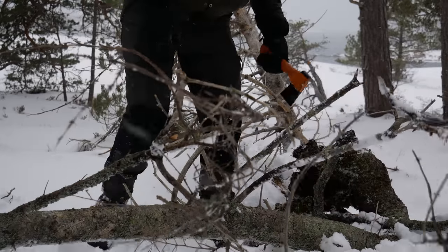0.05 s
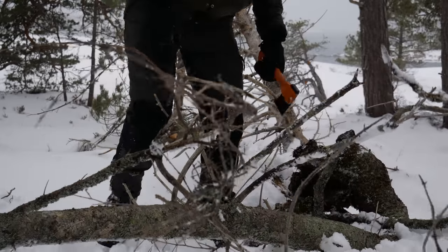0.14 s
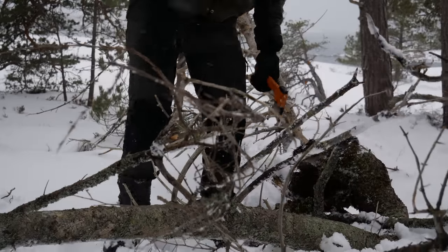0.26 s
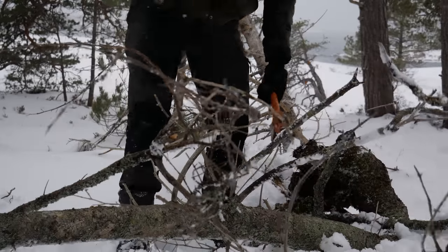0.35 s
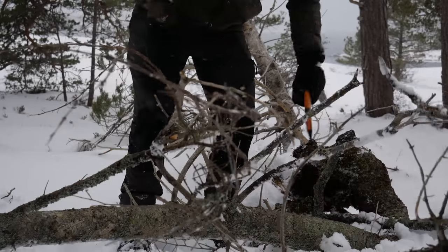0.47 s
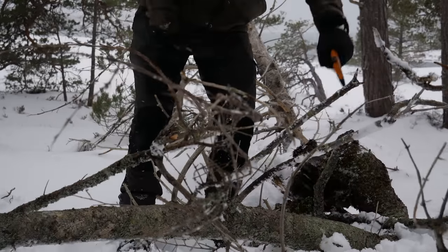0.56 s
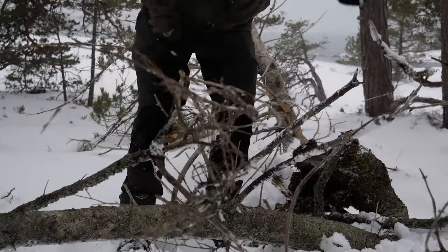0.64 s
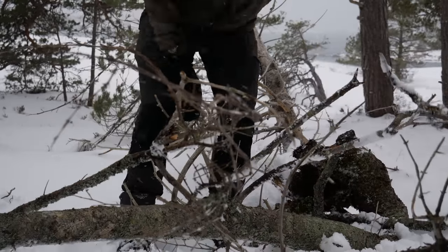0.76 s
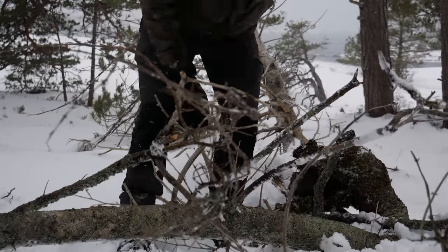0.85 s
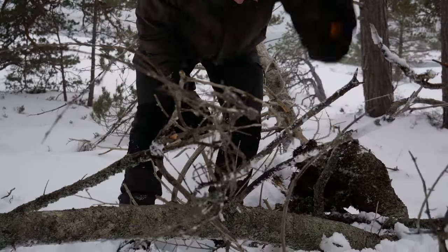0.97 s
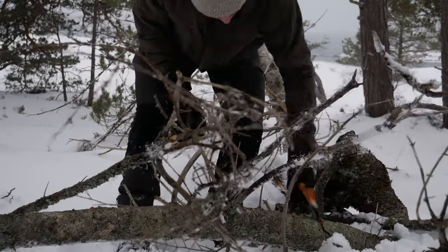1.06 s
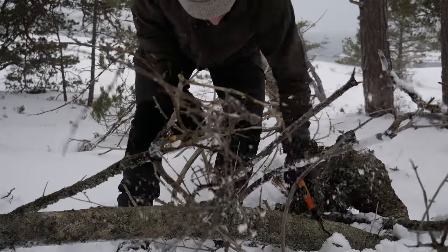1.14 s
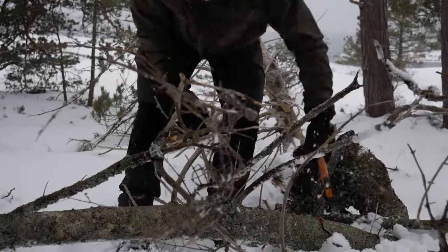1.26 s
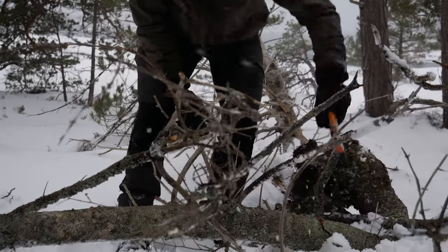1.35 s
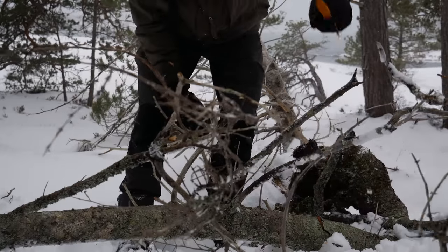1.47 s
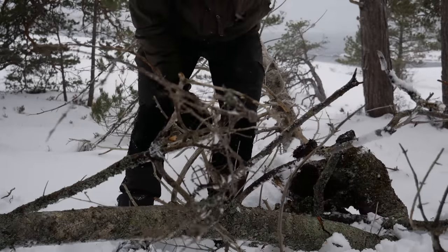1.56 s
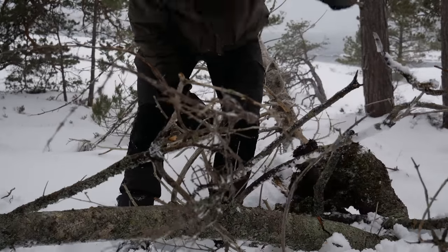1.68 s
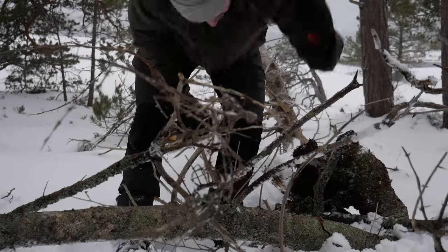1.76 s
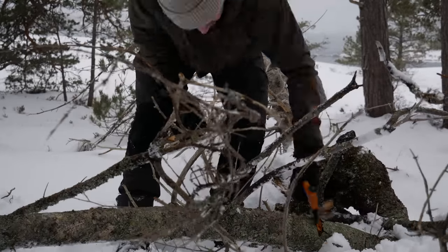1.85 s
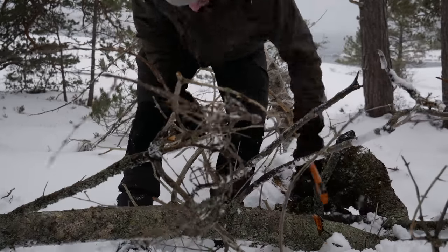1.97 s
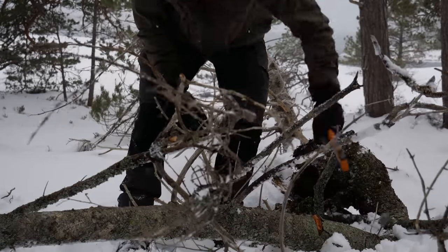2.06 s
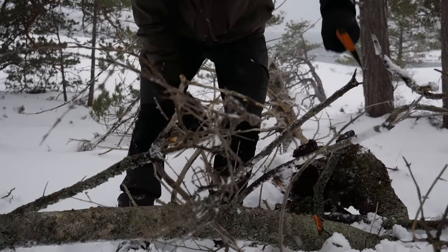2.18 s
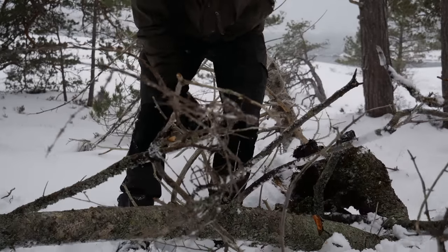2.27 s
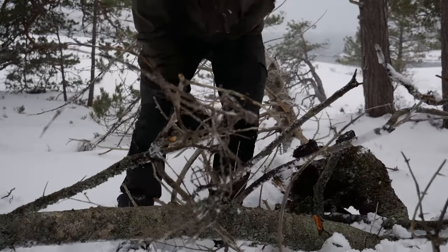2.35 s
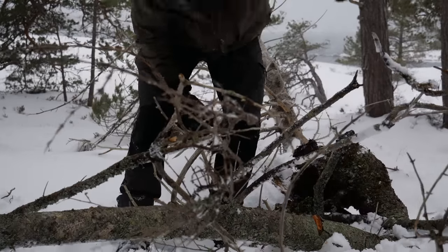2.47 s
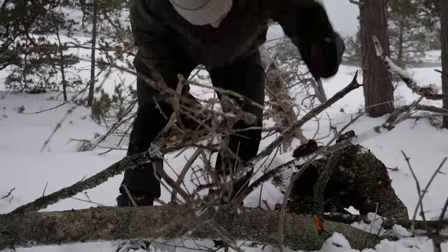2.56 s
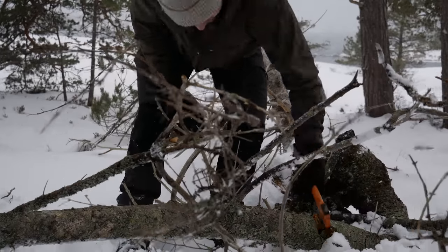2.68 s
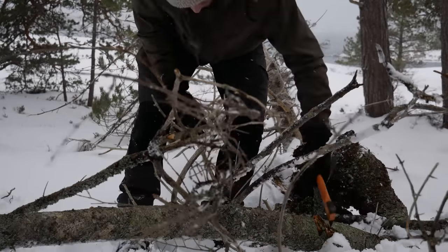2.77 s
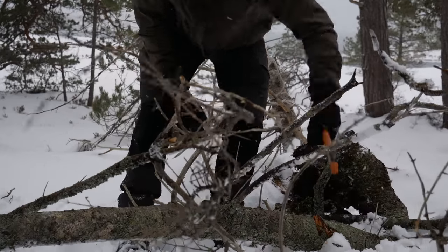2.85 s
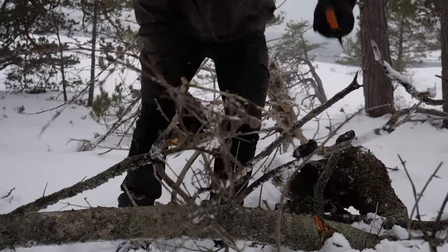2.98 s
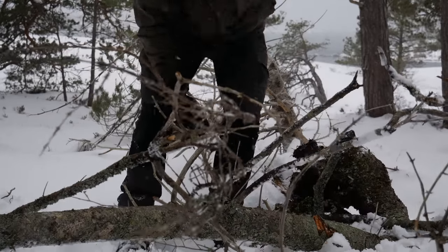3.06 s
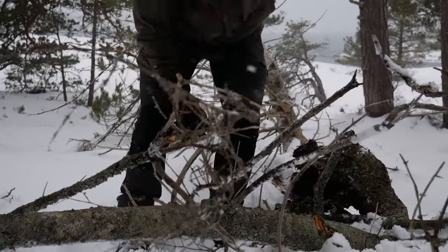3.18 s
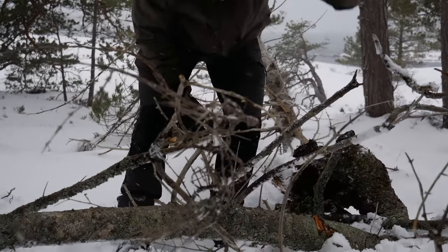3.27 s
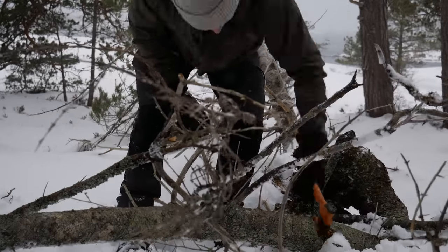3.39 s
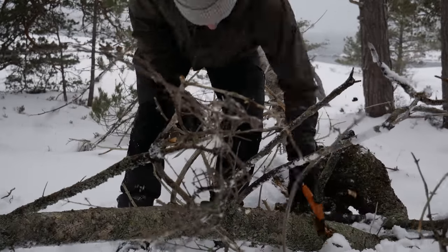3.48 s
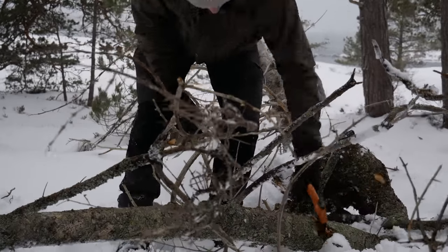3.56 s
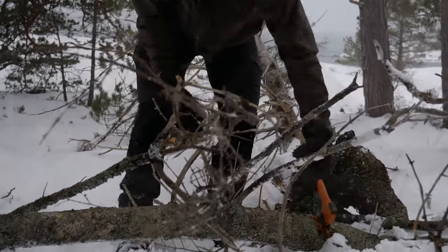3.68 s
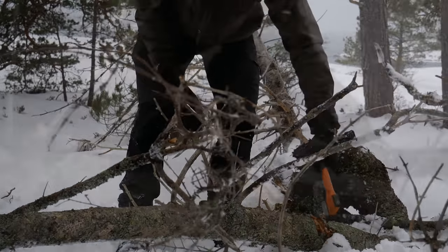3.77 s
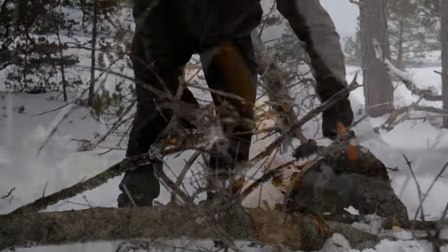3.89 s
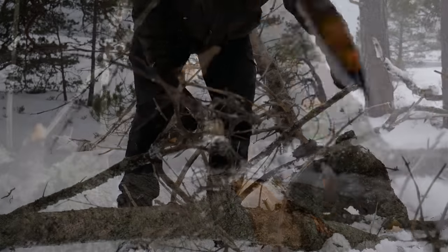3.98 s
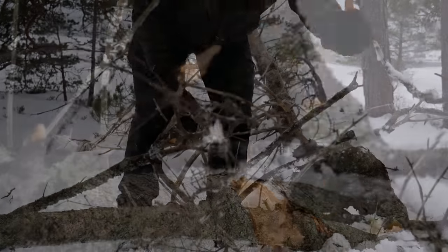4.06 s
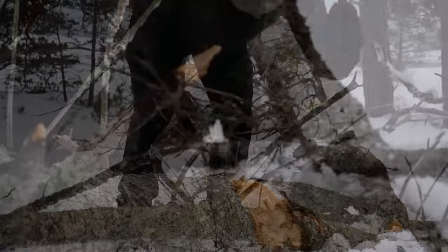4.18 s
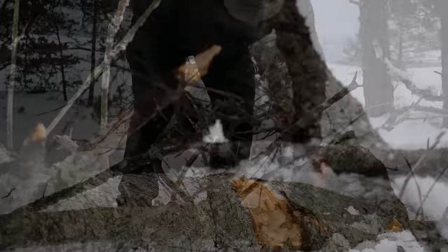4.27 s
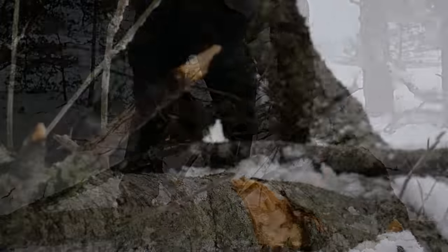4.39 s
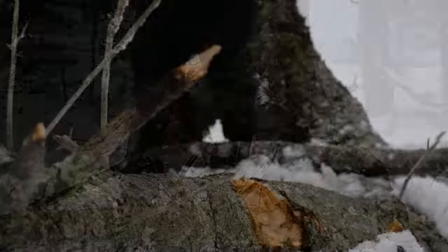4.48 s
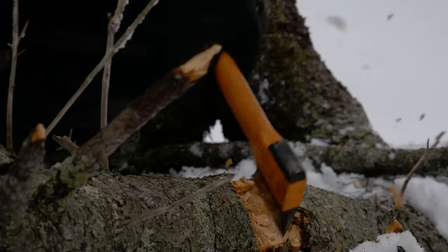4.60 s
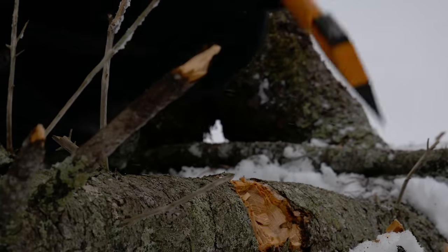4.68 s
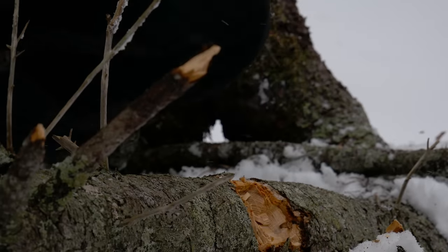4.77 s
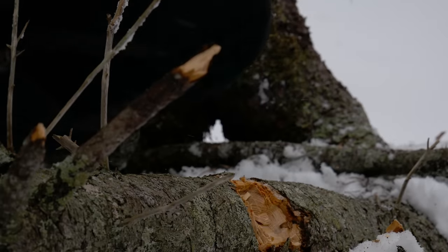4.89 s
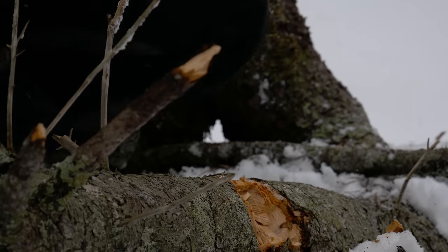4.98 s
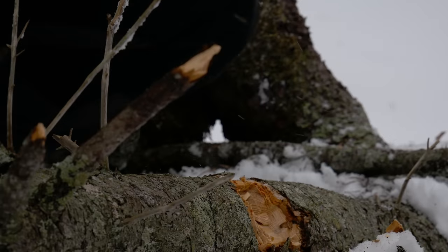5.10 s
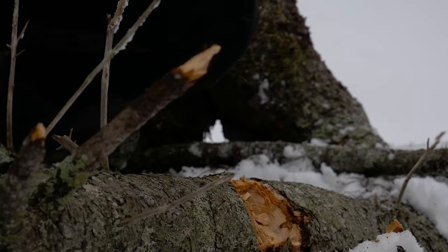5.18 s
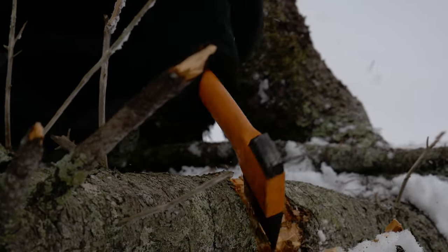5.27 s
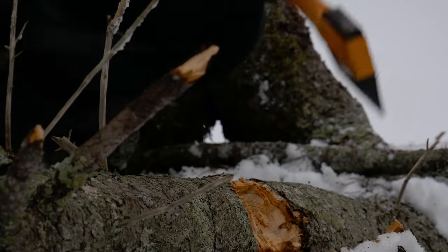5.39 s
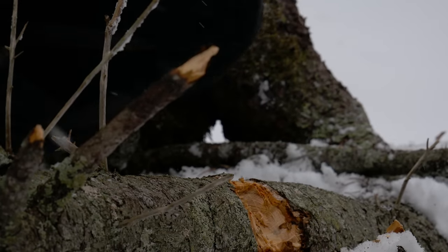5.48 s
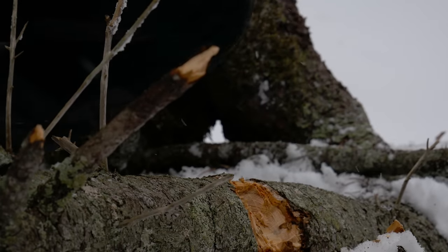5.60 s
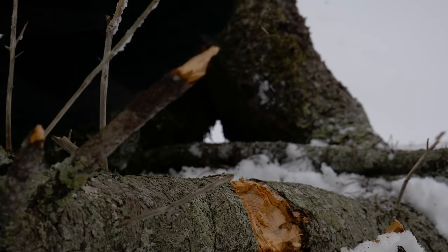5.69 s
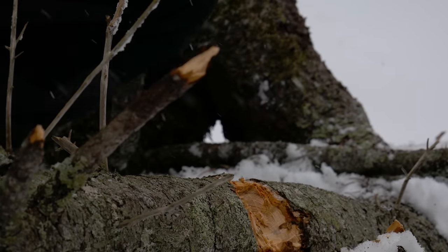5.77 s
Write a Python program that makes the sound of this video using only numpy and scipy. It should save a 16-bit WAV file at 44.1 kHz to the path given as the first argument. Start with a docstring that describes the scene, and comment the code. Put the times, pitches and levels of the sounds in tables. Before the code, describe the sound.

Dry, overloaded axe blows on wood, about one every 0.8 seconds, move from a few steps away to close up in breezy snowy woods.

```python
"""A hatchet chops a thin fallen trunk in a snowy pine wood, first from a few steps away, then, fading over, close by.
Each blow sums decaying wood modes and noise bursts, clipped by an overloaded microphone input with gain control.
Filtered noise and clicks spray as snow and chips; slow low modes make the trunk thud and the ground shudder late.
Short noise ticks are chips landing; shaped noise is wind hissing in the crowns and buffeting the microphone ports."""
import sys
import numpy as np
from scipy import signal
from scipy.fft import rfft, irfft
from scipy.io import wavfile

SR = 44100
rng = np.random.default_rng(int(sys.argv[2]) if len(sys.argv) > 2 else 0)


def to_wav(sig):
    """Store sig (one row per channel, or 1-D mono) as 16-bit WAV at the path in sys.argv[1].

    Samples outside -1..1 are clipped; the rate is SR.
    """
    pcm = np.clip(np.atleast_2d(sig), -1, 1) * 32767
    pcm = np.round(pcm).astype(np.int16)
    wavfile.write(sys.argv[1], SR, pcm.T)  # frames by channels


N = 257544
T = np.arange(N) / SR

# hatchet blows: start_s, place, strength_db (before overdrive), ring_hz, ring_t60_s,
# pitch_excess (share above ring_hz at contact), crack_db, thud_db, thud_tilt_db_per_octave,
# spray_db, spray_lasts_s, bright_crumbs_hz
BLOWS = [(1.133, "far", -7, 973, .036, 0.3, -10, -13.5, -2, -27.5, 0.1, 2980),
         (1.9347, "far", -10.5, 1027, .029, 0.62, 0, -16.5, -5.5, -21, 0.19, 3380),
         (2.7216, "far", -9.5, 958, .026, 1.11, -22, -16, -5.5, -27.5, 0.26, 3500),
         (3.495, "far", 0, 969, .023, 0.12, -5, -13, 1, -19, 0.37, 4260),
         (3.891, "close", 0.5, 781, .031, 0.63, -17, -8, -0.7, -24, 0.24, 3500),
         (4.3824, "far", -7, 969, .026, 0.264, -29, -18, -4, -31, 0.058, 3500),
         (4.609, "close", -2.5, 839.5, .024, 1.38, 1.5, -11.5, -0.5, -19, 0.15, 6570),
         (5.319, "close", -9.5, 897, .038, 0.56, -23, -9, 4, -46, 0.049, 3500)]
# overtones of the wood ring: frequency_ratio, relative_level_db, share_of_ring_t60
WOOD_OVERTONES = [(0.781, -0.5, 0.9), (1, 3.5, 0.97), (1.45, 1, 0.58), (1.799, -5.5, 0.67),
                  (2.299, -12.5, 0.73), (3.1, 0, 0.091)]
# slow bending of the trunk, lows arrive later: frequency_hz, relative_level_db, t60_s, delay_s
TRUNK_MODES = [(477, 8.5, 0.16, 0.00499), (400, 19, 0.034, 0.00705), (283.2, 12.5, 0.12, 0.00837),
               (205.4, -2, 0.27, 0.0132), (149.1, 2.5, 0.23, 0.0201), (110, -3, 0.24, 0.0293)]
# bending of the ground under it: frequency_hz, relative_level_db, t60_s, delay_s (added to the place delay)
GROUND_MODES = [(75.9, 8.7, 0.33, -0.0173), (55.1, 9.7, 0.64, 0.0013), (35.9, 4.7, 0.68, 0.0037)]
# ground shudder at each place: level_db, delay_s, tilt_db_per_octave
GROUND_PATHS = {"far": (-22, .097, -1), "close": (-24, .075, -5)}
LEAD_S = .004   # sound rendered ahead of contact
OVERDRIVE_DB, BRIGHT_CRUMBS_DB, SPLINTER_DB = 19.5, 1.5, -2.5
SAG_S = .0018   # time constant of the falling ring pitch


def blows():
    """Impact excitation: the blade sets wood modes ringing, cracks fibres, and shakes trunk, snow and ground."""
    out = np.zeros(N)
    t = np.arange(round(.6 * SR)) / SR - LEAD_S
    after = np.maximum(t, 0)
    spray = debris()
    for (start, place, strength_db, ring_hz, ring_t60, excess, crack_db,
         thud_db, tilt_db, spray_db, lasts, crumbs_hz) in BLOWS:
        shudder_db, ground_delay, ground_tilt_db = GROUND_PATHS[place]
        # the cut is stiffest on contact, so the ring starts high and sags
        cycles = ring_hz * (t + excess * SAG_S * (1 - np.exp(-after / SAG_S)))
        phases = rng.random(len(WOOD_OVERTONES))
        noise = rng.standard_normal((3, len(t)))
        ring = 0
        for (ratio, db, share), phase in zip(WOOD_OVERTONES, phases):
            ring = ring + amp(db) * dying(t, ring_t60 * share) * np.sin(2 * np.pi * (ratio * cycles + phase))

        crack = amp(crack_db) * band(noise[0], 1130, 5200) * dying(t, 0.018)
        # torn grain fills the gaps between the modes
        splinters = amp(SPLINTER_DB) * rms_one(band(noise[1], 710, 1660)) * dying(t, 0.73 * ring_t60)
        # the force builds while the wedge sinks in
        contact = 1 - np.exp(-(after / 0.001) ** 2)
        # the edge starts cutting bark just before
        bite = amp(-33) * band(noise[0], 900, 5400) * np.exp(-np.abs(t) / 0.0027)
        blow = amp(strength_db + OVERDRIVE_DB) * (ring + crack + splinters) * contact + bite

        crumbs = np.resize(spray[round(start * SR):], len(t))
        crumbs = crumbs + amp(BRIGHT_CRUMBS_DB) * band(crumbs, crumbs_hz / 1.11, crumbs_hz * 1.03)
        falling = dying(t, 0.3) / (1 + (after / lasts) ** 4)   # keeps raining, then stops
        fallout = amp(spray_db) * crumbs * falling

        # the trunk jolts on its bed
        loose = 1.25 * rms_one(band(noise[2], 120, 380)) * dying(t - .004, .16)
        thud = amp(thud_db) * (swelling(t, TRUNK_MODES, 0.00026, 0.13, tilt_db) + loose)
        shudder = amp(shudder_db) * swelling(t - ground_delay, GROUND_MODES, 0.036, 0.12, ground_tilt_db)
        add(out, start - LEAD_S, fade(start, place) * overload(blow + fallout + thud + shudder))
    return out


def swelling(t, modes, rise_s, detune, tilt_db=0):
    """Modal superposition: delayed damped modes build up, then die."""
    out = 0
    # the blade lands elsewhere each time, so strength and pitch vary
    draws = rng.random((len(modes), 3))
    for (hz, db, t60, delay), (luck, phase, offset) in zip(modes, draws):
        u = np.maximum(t - delay, 0)
        pitch = hz * (1 + detune * (offset - .5))
        level = amp(db + tilt_db * np.log2(hz / 256) + 4.75 * (luck - 3.0))
        envelope = level * (1 - np.exp(-u / rise_s)) * dying(u, t60)
        out = out + envelope * np.sin(2 * np.pi * (pitch * u + phase))
    return out


# spectral density of the spray: frequency_hz, relative_density_db_per_hz
SPRAY_SPECTRUM = [(470, -19), (800, -45), (1080, 11.5), (1780, -6.5), (3510, -1.5), (4990, -7), (6090, -2),
                  (7360, -7), (13300, -19), (16000, -23)]


def debris():
    """Granular noise: clumped snow hiss plus random clicks, each exciting one of ten resonant bands; rms 1."""
    sizes = amp(6.0 * np.minimum(rng.exponential(1, N), 3)) * rng.choice([-1, 1], N)
    chance = 1400 * amp(6 * drift(40)) / SR
    clicks = sizes * (rng.random(N) < chance) + 1e-18
    dealt = rng.integers(0, 10, N)   # which band each click excites
    hz, db = np.transpose(SPRAY_SPECTRUM)
    ticks = 0
    for k, pitch in enumerate(np.geomspace(1300, 9000, 10)):
        edges = pitch / 1.2, pitch * 1.2
        tick = band(band(clicks * (dealt == k), *edges), *edges)
        ticks = ticks + amp(np.interp(np.log(pitch), np.log(hz), db)) * tick
    snow = coloured(SPRAY_SPECTRUM) * amp(3.8 * drift(45))
    return rms_one(snow + 0.42 * rms_one(ticks))


CLIP_TOP, HOLD_DB = 0.77, -10.5   # clipping amplitude, gain control threshold
RELEASE_DB_S, ATTACK_S = 69, .0017   # release rate in dB per second, attack time constant


def overload(x):
    """Saturation and compression: the input clips flat, then the gain control takes a few ms to pull down."""
    x = np.clip(x, -CLIP_TOP, CLIP_TOP)
    t = T[:len(x)]
    level = 20 * np.log10(np.abs(x) + 1e-6)
    # peak level, released at a constant rate
    held = np.maximum.accumulate(level + RELEASE_DB_S * t) - RELEASE_DB_S * t
    r = np.exp(-1 / (ATTACK_S * SR))
    reduction_db = signal.lfilter([1 - r], [1, -r], np.maximum(held - HOLD_DB, 0))
    return x * amp(-reduction_db)


JOLT_DELAY_S, JOLT_DB, JOLT_HZ = 0.038, -14.5, 56


def jolts():
    """Damped oscillation: a low swing follows each close blow and soon dies."""
    out, t = np.zeros(N), np.arange(round(.1 * SR)) / SR
    envelope = amp(JOLT_DB) * (1 - np.exp(-t / 0.0037)) * dying(t, 0.15)
    swing = envelope * np.sin(2 * np.pi * JOLT_HZ * t)
    for start, place, *_ in BLOWS:
        if place == "close":
            add(out, start + JOLT_DELAY_S, fade(start, place) * swing)
    return out


FADE_FROM_S, FADE_TO_S = 3.27, 5.05   # the far place fades out while the close one fades in


def fade(s, place):
    """Linear cross-fade: the two places' gains sum to one; each blow takes the gain at its start."""
    share = np.clip((s - FADE_FROM_S) / (FADE_TO_S - FADE_FROM_S), 0, 1)
    return share if place == "close" else 1 - share


# clearest chips and twigs landing or snapping: start_s, level_db (before decay), pitch_hz, width_octaves, t60_s
CHIPS = [(1.972, -30, 3800, .8, .01), (1.99, -29.5, 3360, 1.1, .02), (2.07, -43, 3260, 0.55, .033),
         (2.825, -34, 7000, 2.5, 0.013), (2.837, -37, 3220, 1.3, 0.041), (2.85, -39.5, 3870, 1.8, 0.073),
         (3.006, -44, 4970, 1.6, .011), (3.5154, -26, 5000, 1.8, .013), (3.56, -40, 5500, .88, 0.023),
         (3.612, -41, 5000, 1.6, .014), (3.6925, -38, 5500, 1.1, .011), (3.717, -45, 5500, .89, .02),
         (3.8477, -32.5, 3200, .41, .015), (3.9394, -40, 9000, 1.6, .014), (4.437, -35, 7600, .9, 0.0084),
         (4.6236, -20, 4030, 2.6, .019), (4.643, -35, 3660, 1.2, .015), (4.668, -32, 3520, 1.3, 0.021),
         (4.708, -31.5, 2830, 1.1, .011), (5.278, -33, 7940, 1.3, .009), (5.34, -24, 4030, 2.1, .01),
         (5.3497, -28, 5000, 1.8, 0.0073), (5.3726, -35, 5030, 1.8, .025), (5.426, -31.5, 6660, 1.4, 0.014)]
# a boot settles in the snow: start_s, level_db (before decay)
BOOT_STEPS = [(1.045, -32.5), (4.55, -31)]


def chips():
    """Band-limited transients: short dry noise ticks for chips, a dull low crunch for the boot."""
    out, t = np.zeros(N), np.arange(round(.12 * SR)) / SR
    ticks = CHIPS + strays()
    noises = rng.standard_normal((len(ticks), len(t)))
    for (start, db, hz, octaves, t60), noise in zip(ticks, noises):
        edges = hz / 2 ** (octaves / 2), hz * 2 ** (octaves / 2)
        add(out, start, amp(db) * rms_one(band(band(noise, *edges), *edges)) * dying(t, t60))
    for start, db in BOOT_STEPS:
        crunch = rms_one(band(band(rng.standard_normal(len(t)), 42, 280), 42, 300))
        add(out, start, amp(db) * crunch * dying(t, 0.27))
    return out


STRAY_COUNT, STRAY_DELAY_S = 4, .06   # per blow; mean of the random part of the delay
STRAY_BELOW_SPRAY_DB, STRAY_T60_S, STRAY_OCTAVES = -16.5, .013, 1.2


def strays():
    """Exponential waiting times: small chips land at random after each blow, later ones fainter."""
    rows = []
    for start, *_, spray_db, lasts, crumbs_hz in BLOWS:
        for wait, pitch in rng.random((STRAY_COUNT, 2)):
            delay = .015 - STRAY_DELAY_S * np.log(1 - wait)
            level_db = spray_db + STRAY_BELOW_SPRAY_DB - 40 * delay
            rows.append((start + delay, level_db, 3300 * 2.5 ** pitch, STRAY_OCTAVES, STRAY_T60_S))
    return rows


# wind levels before drift: time_s, crowns_db, fine_hiss_db
WIND_LEVELS = [(0.0, -39, -53), (0.36, -41, -52.5), (0.75, -38.5, -50), (1.15, -37.5, -48.5),
               (1.63, -40, -53.5), (2.07, -42.5, -53.5), (2.36, -42.5, -55), (2.62, -45, -54.5),
               (2.81, -42.5, -51), (3.25, -43.5, -55.5), (3.43, -42, -52.5), (3.58, -38.5, -52.5),
               (3.97, -44, -55), (4.24, -40, -52), (4.52, -39, -48.5), (4.83, -38.5, -49.5),
               (5.19, -39.5, -49.5), (5.84, -39.5, -51)]
# gusts on the microphone ports, before drift: time_s, level_db
GUST_LEVELS = [(0.0, -41), (0.13, -27.5), (0.57, -26), (0.89, -32), (1.27, -42), (1.84, -48.5), (2.15, -40),
               (2.49, -53), (2.91, -44.5), (3.32, -46), (3.69, -40.5), (4.1, -28), (4.47, -29.5),
               (4.78, -27.5), (5.16, -33.5), (5.34, -31.5), (5.48, -30.5), (5.84, -45.5)]
# spectral density of the far crowns: frequency_hz, relative_density_db_per_hz
CROWN_SPECTRUM = [(41, -22), (70, -22), (128, -12.5), (216, -8), (267, -4.5), (337, -6), (536, -5.5),
                  (586, -6.5), (853, -4.5), (3760, -21), (5000, -30), (6500, -102), (11000, -120)]
# spectral density of the fine hiss: frequency_hz, relative_density_db_per_hz
HISS_SPECTRUM = [(1470, 10), (2500, 3), (3400, -11), (5380, 1), (6300, -2.5), (8170, -2), (10400, -10.5),
                 (13200, -7.5), (15600, -16), (16100, -36), (16500, -40)]
# spectral density of the buffeting: frequency_hz, relative_density_db_per_hz
BUFFET_SPECTRUM = [(7.1, -12), (12, 4.5), (24, -11), (46, -13), (118, -28.5), (201, -34), (250, -45.5),
                   (320, -35), (550, -120)]


def wind():
    """Turbulence as modulated noise: smooth hiss of far crowns, finer hiss above, lumpy buffeting below."""
    crowns_db, hiss_db = in_time(WIND_LEVELS)
    crowns = coloured(CROWN_SPECTRUM) * amp(crowns_db + 2.07 * drift(1.84))
    hiss = coloured(HISS_SPECTRUM) * amp(hiss_db + .8 * drift(9))
    gusts_db = in_time(GUST_LEVELS)[0]
    buffeting = coloured(BUFFET_SPECTRUM) * amp(gusts_db + 2.2 * drift(3.5))
    return crowns + hiss + buffeting


# spectral density of the hiss that differs between the ears: frequency_hz, relative_density_db_per_hz
SIDE_SPECTRUM = [(59, -31), (100, 33), (373, 38.5), (2220, 37.5), (4670, 31), (12900, 26), (15000, 29),
                 (16000, -25)]


def side_hiss():
    """Decorrelation: faint noise, to be added with opposite signs, separates left from right."""
    return amp(-61 + 0.6 * drift(14.0)) * coloured(SIDE_SPECTRUM)


def amp(db):
    """Logarithmic level: decibels to amplitude gain."""
    return 10 ** (np.asarray(db) / 20)


def rms_one(x):
    """Power normalisation: scale to rms 1."""
    return x / np.sqrt(np.mean(x ** 2) + 1e-20)


def in_time(rows):
    """Linear interpolation: columns of a curve table at every sample."""
    s, *columns = np.transpose(rows)
    return [np.interp(T, s, c) for c in columns]


def coloured(spectrum):
    """Spectral shaping: noise with the given spectrum, 90 dB down outside it on the table's scale; rms 1."""
    hz, db = np.transpose(spectrum)
    grid = np.maximum(np.fft.rfftfreq(N, 1 / SR), 1)
    gain = amp(np.interp(np.log(grid), np.log(hz), db, left=-90, right=-90))
    return rms_one(irfft(rfft(rng.standard_normal(N)) * gain, N))


def drift(rate_hz):
    """Low-passed noise: slow random wandering of rms 1."""
    r = np.exp(-2 * np.pi * rate_hz / SR)
    noise = rng.standard_normal(N + SR)
    settled = signal.lfilter([1], [1, -2 * r, r * r], noise)[SR:]
    return rms_one(settled)


def dying(t, t60):
    """Exponential decay: starts at t = 0 and falls 60 dB in t60 seconds."""
    return (t >= 0) * amp(-60 * np.maximum(t, 0) / t60)


def band(x, lo_hz, hi_hz):
    """Resonant selection: two-pole band-pass."""
    edges = [lo_hz, min(hi_hz, .45 * SR)]
    return signal.sosfilt(signal.butter(1, edges, "band", fs=SR, output="sos"), x)


def add(out, s, x):
    """Superposition: mix x into out from s seconds on."""
    i = min(round(s * SR), N)
    out[i:i + len(x)] += x[:N - i]


def scene():
    """Mid-side sum: a mono microphone, with only a faint hiss differing between left and right."""
    mid = blows() + jolts() + chips() + wind()
    side = side_hiss()
    return np.array([mid + side, mid - side])


def record(dry):
    """Band limitation: a steep low-pass, 60 dB down from 16.8 kHz, cuts the top."""
    return signal.sosfilt(signal.cheby2(10, 60, 16800, fs=SR, output="sos"), dry)


dry = scene()
out = record(dry)
to_wav(out)
```